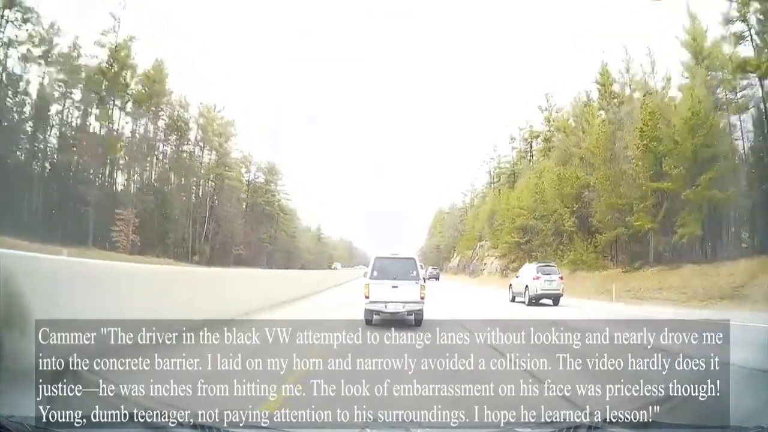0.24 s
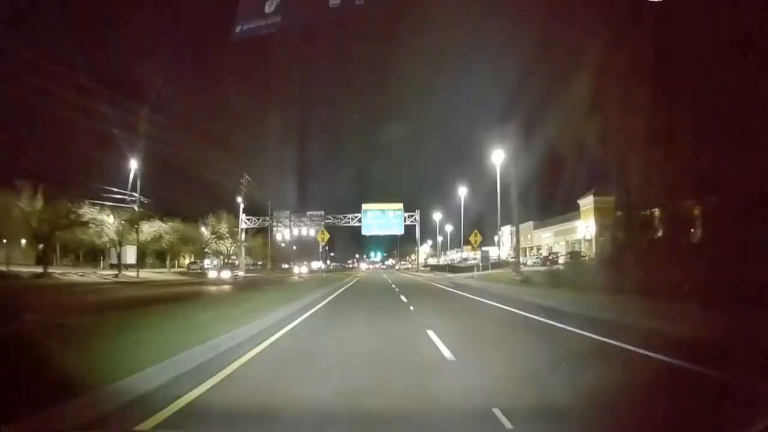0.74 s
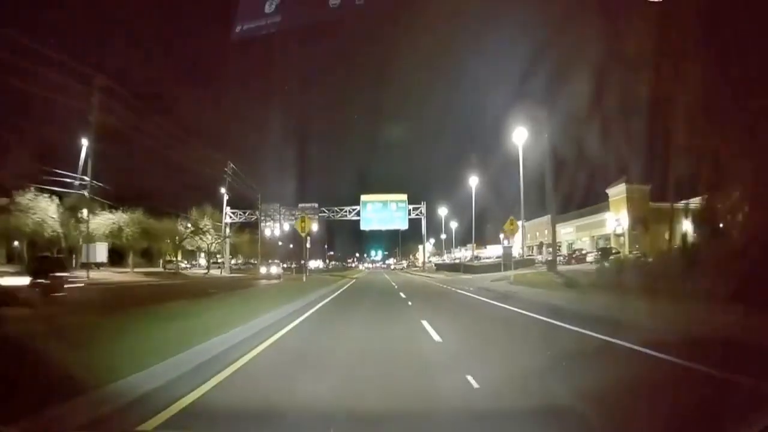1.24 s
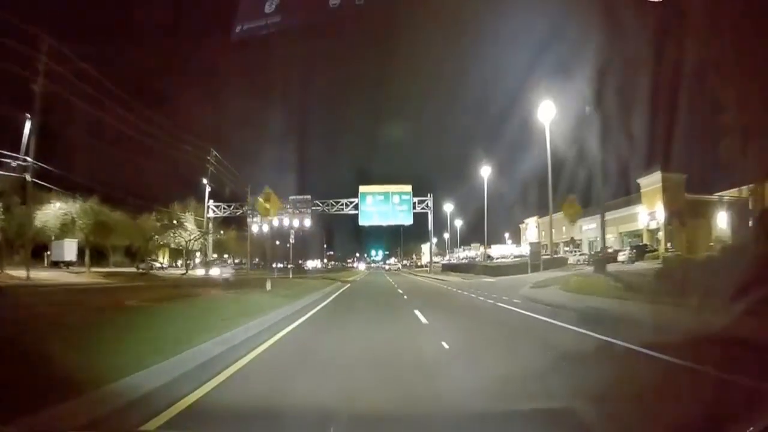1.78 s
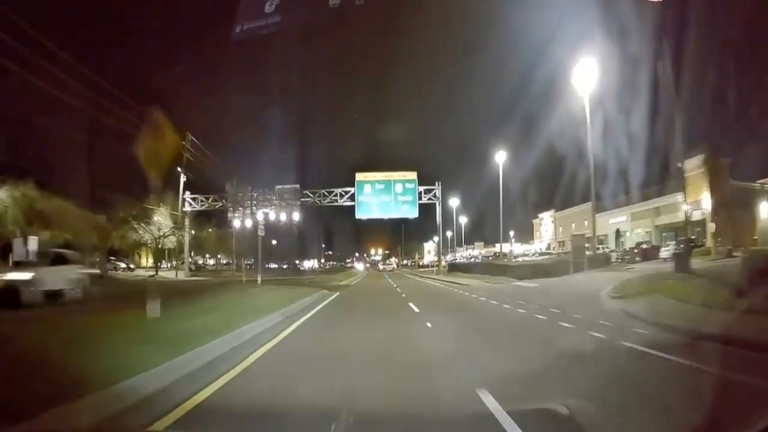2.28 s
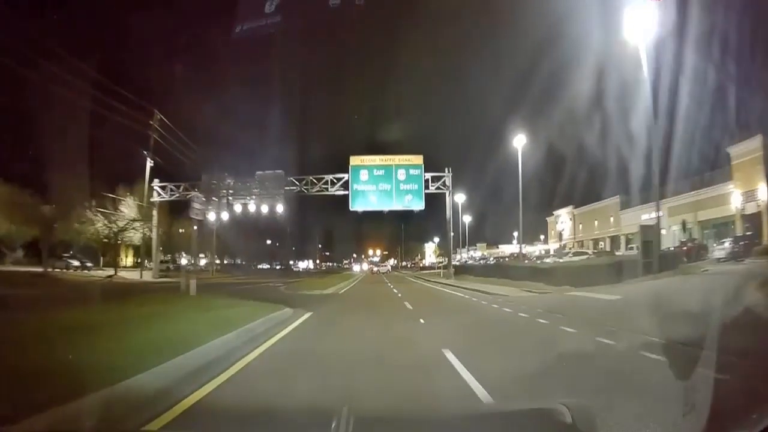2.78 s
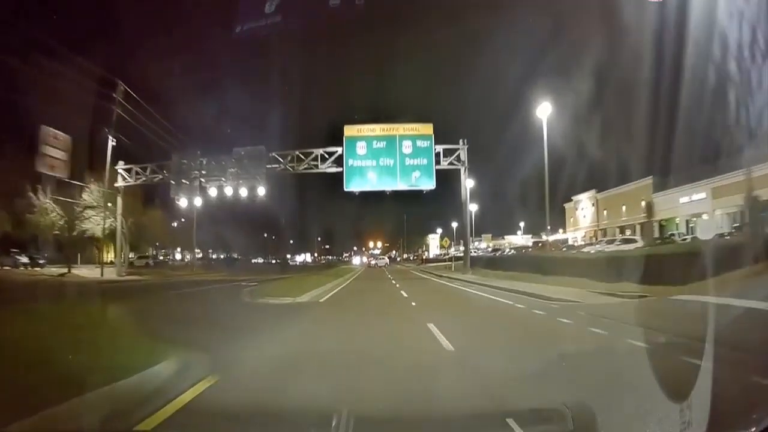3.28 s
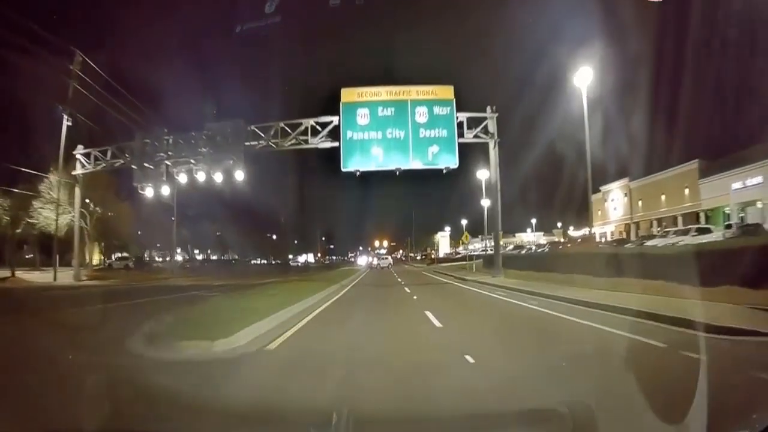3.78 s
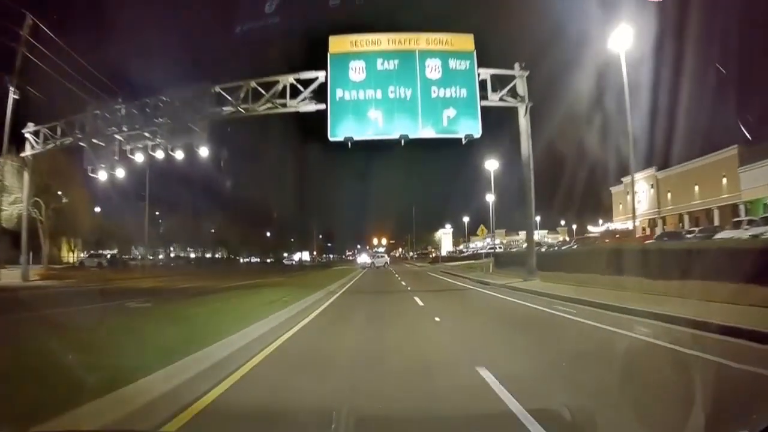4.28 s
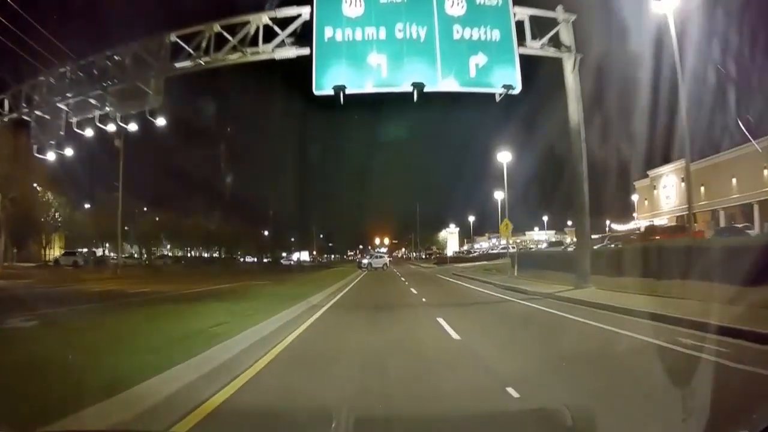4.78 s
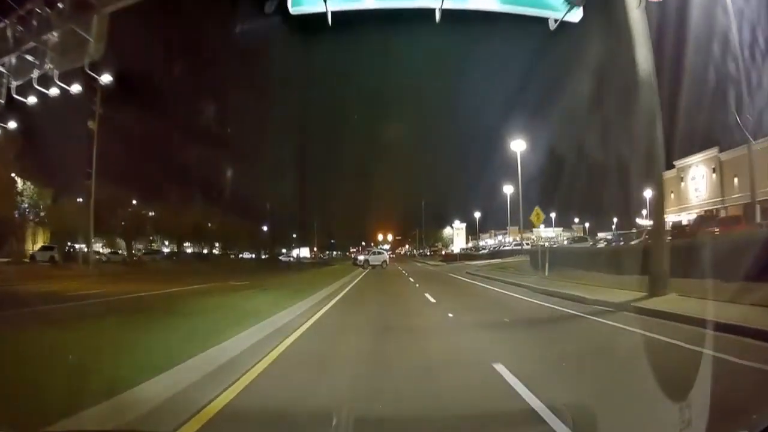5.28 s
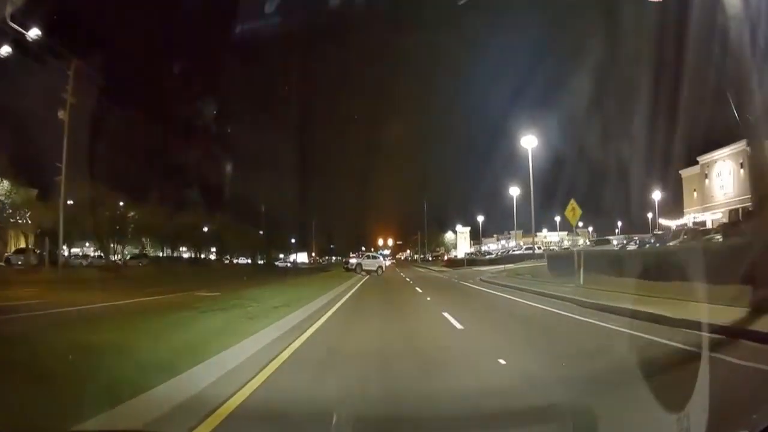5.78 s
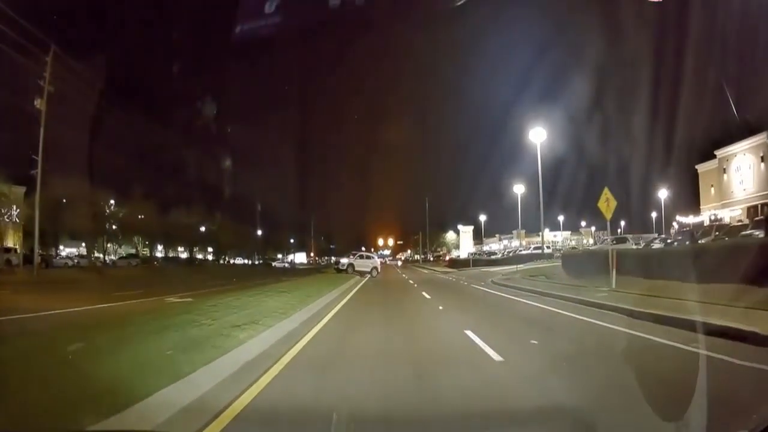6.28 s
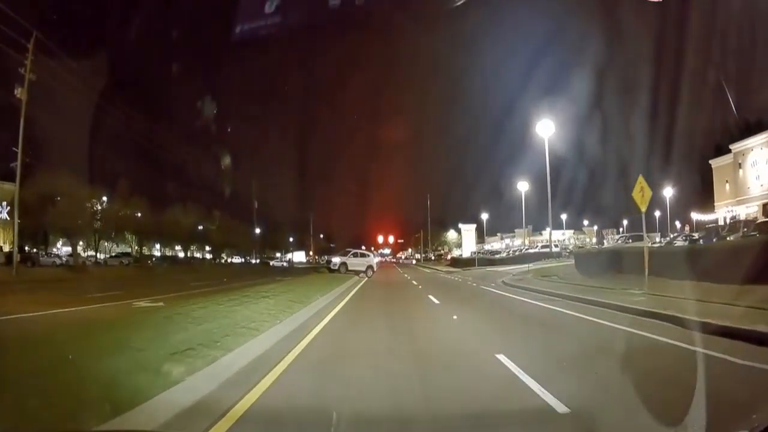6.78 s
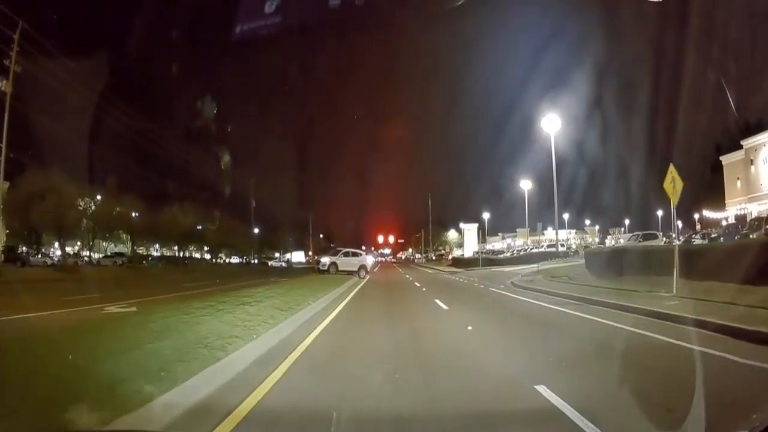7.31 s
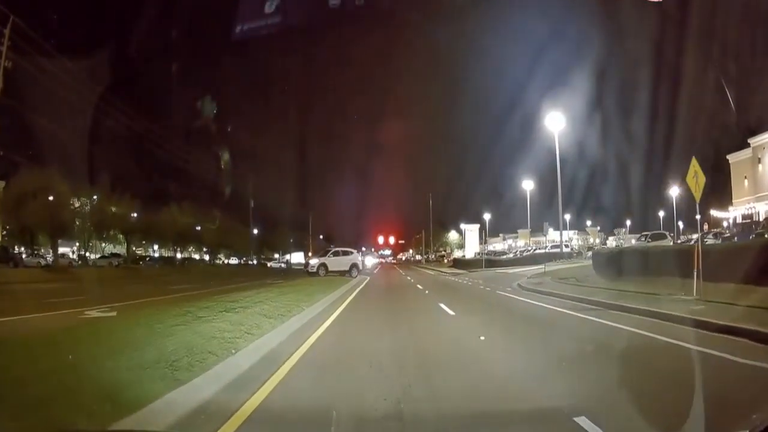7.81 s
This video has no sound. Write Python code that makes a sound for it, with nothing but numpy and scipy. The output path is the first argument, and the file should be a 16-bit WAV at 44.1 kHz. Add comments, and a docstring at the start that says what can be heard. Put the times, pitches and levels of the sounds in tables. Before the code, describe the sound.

A microphone inside a moving car picks up steady road roar, deep cabin rumble and faint air hiss, all starting suddenly. A quick run of wheel thumps shakes the interior trim. Afterwards the car coasts and brakes, so the tyre noise gradually fades and the low engine note falls towards idle. Meanwhile something small swings and clicks softly against plastic, a few ticks at a time.

```python
"""Tyre roar, body boom and a falling engine note cut in abruptly, inside a car already at speed.
It coasts, then slows for a red light: the roar fades, the hiss at the seals dies away, and the road
drives the body, the cabin air and the air in the tyres, each hardest at its own speed.
The wheels thud over a rough patch and rattle the trim; then a small loose piece swings
and ticks against plastic in little clusters."""
import sys
import numpy as np
from scipy import signal
from scipy.fft import rfft, irfft, next_fast_len
from scipy.io import wavfile
from scipy.ndimage import uniform_filter1d

SR = 44100
rng = np.random.default_rng(int(sys.argv[2]) if len(sys.argv) > 2 else 0)


def file_out(sig):
    """Save sig as 16-bit WAV at sys.argv[1]."""
    # one column per channel
    cols = np.atleast_2d(sig).T
    # limit, then scale
    lim = np.clip(cols, -1, 1)
    pcm = np.round(lim * 32767).astype(np.int16)
    wavfile.write(sys.argv[1], SR, pcm)


N = 355005
T = np.arange(N) / SR

# Tyre roar at high and low speed, air at the seals: freq_hz, density_db
FAST_ROAR_SPECTRUM = [(30, 6), (85, -2), (180, 2), (300, -2.5), (500, -3.5), (1000, -6.5), (1280, -7.5),
                      (1500, -23.5), (1900, -37), (3000, -36), (4200, -66), (9000, -51)]
SLOW_ROAR_SPECTRUM = [(30, 6), (55, 3), (85, 5), (180, 6), (300, -1), (500, -3), (1000, -5.5), (1280, -8),
                      (1500, -18.5), (1900, -24), (3000, -31), (4200, -46), (9000, -70)]
SEAL_SPECTRUM = [(500, -8.5), (1500, 9), (2000, 3), (2600, 2), (3000, -1), (3500, -2), (3900, -12.5),
                 (5000, -16), (8000, -21), (15000, -20.5)]
# Cabin resonances, tread whine, seal sizzle: centre_hz, width_hz, lift_db
CABIN_PEAKS = [(379, 76, 3.5), (470, 18, 4.5), (532, 38, 5), (660, 29, 6), (757, 86, 4.5), (894, 57, 6),
               (1012, 61, 6.5), (1172, 38, 4), (1256, 45, -0.5), (2925, 230, 5.5), (3490, 170, 3)]
TREAD_PEAKS = [(1040, 85, 2.5)]
SEAL_PEAKS = [(2930, 140, 3)]

def tyres_and_seals(grain_db=0.5, flutter_db=1.23, draught_db=-61):
    """Tyres roar and air hisses at the seals; both fall with speed and flutter with the road's grain."""
    halvings, smooth = speed_halvings(), smoothness()
    roar_db = -28 - 10.5 * halvings - 3.5 * smooth
    rush_db = -46 - 34.5 * halvings - 3 * smooth
    slow_share = np.clip((-27 - roar_db) / 16, 0, 1)  # quieter roar, slower car
    fast = noise(FAST_ROAR_SPECTRUM, CABIN_PEAKS) * gain_of(1)
    slow = noise(SLOW_ROAR_SPECTRUM, CABIN_PEAKS + TREAD_PEAKS) * gain_of(2)
    roar = np.sqrt(1 - slow_share) * fast + np.sqrt(slow_share) * slow
    rush = noise(SEAL_SPECTRUM, CABIN_PEAKS + SEAL_PEAKS) * gain_of(rush_db)
    draught = noise(SEAL_SPECTRUM, CABIN_PEAKS) * gain_of(draught_db)
    hiss = (rush + draught) * gain_of(flutter_db * noise([(2, -1.8), (20, -1.2)]))
    grain = gain_of(grain_db * noise([(3, 7), (30, -5), (90, -42)]))
    return grain * (roar * gain_of(roar_db) + hiss)


# Body shudder, cabin boom, tyre cavity ring, low drone: freq_hz, density_db
SHUDDER_SPECTRUM = [(8, -37), (20, -2), (32, 2), (44, 7.5), (54, -6.5), (70, -12), (120, -43)]
BOOM_SPECTRUM = [(55, -30), (76, -19), (95, -12.5), (112, -4), (124, -1), (138, -3), (160, -10.5),
                 (220, -17.5)]
CAVITY_SPECTRUM = [(150, -32), (205, -5), (225, -7), (245, 0), (262, -4.5), (295, -10.5), (370, -11),
                   (450, -16.5), (600, -63)]
DRONE_SPECTRUM = [(62, -20), (78, -4.5), (92, -3), (112, 1), (132, -18)]
# Side resonances of boom and tyre ring: centre_hz, width_hz, lift_db
BOOM_PEAKS = [(115.4, 5, -1.5), (134.7, 5.3, 5.5)]
CAVITY_PEAKS = [(224.8, 8.8, 12)]
# Brief swells and dips in the low shudder, boom and tyre ring:
# centre_s, shudder_lift_db, boom_lift_db, cavity_lift_db
LOW_SWELLS = [(.95, 1.5, 4.5, 3.5), (1.87, -1, -2, 3), (2.5, -1.5, 3.5, 5), (3.32, 3, -1, 5),
              (3.72, -5, 3.5, 2.5), (4.26, -1, 0.5, 4.5), (4.5, -3, 3.5, 1), (4.95, 4.5, -0.5, 3),
              (5.22, 2, 1.5, 0), (5.56, 5.5, -0.5, 5.5), (5.82, 2, -0.5, 3.5), (6.09, 4, 0.5, 6),
              (6.48, 1, 4, 4.5), (6.93, 1, 4, 5.5), (7.3, 4, -1.5, 0.5), (7.85, -8, 3.5, 5)]

def low_resonances(wander_db=0.98, swell_half_width_s=0.13):
    """The road drives the sprung body, cabin air and air in the tyres; a drone joins at low speed."""
    wander = gain_of(wander_db * noise([(1, 9), (6, -15)]))
    centre_s, *lifts_db = np.transpose(LOW_SWELLS)
    swell_shapes = np.exp(-((T[:, None] - centre_s) / swell_half_width_s) ** 2)
    shudder_db, boom_db, cavity_db = (swell_shapes @ lift_db for lift_db in lifts_db)
    shudder_db -= 3 * smoothness()
    shudder = steadied(noise(SHUDDER_SPECTRUM), size=12000)
    shudder *= gain_of(shudder_db + drive_db(top_db=-32, best_speed=0.95, loss_db=4.6))
    boom = steadied(noise(BOOM_SPECTRUM, BOOM_PEAKS) + hum(122.5, -1.7), size=6000)
    boom *= gain_of(boom_db + drive_db(top_db=-30.5, best_speed=0.64, loss_db=14.4))
    cavity_hum = hum(241, -5.5) * gain_of(1.3 * cavity_db)  # pitch clears as the ring swells
    cavity = steadied(noise(CAVITY_SPECTRUM, CAVITY_PEAKS) + cavity_hum, size=6000)
    cavity *= gain_of(cavity_db + drive_db(top_db=-34, best_speed=0.75, loss_db=16))
    drone = noise(DRONE_SPECTRUM) * gain_of(drive_db(top_db=-42.5, best_speed=0.41, loss_db=42))
    return wander * (shudder + boom + cavity + drone)


def drive_db(top_db, best_speed, loss_db):
    """Resonance level: peaks at best_speed (cruise = 1), down by loss_db at half or double that."""
    return top_db - loss_db * (speed_halvings() + np.log2(best_speed)) ** 2


def hum(pitch_hz, relative_db, waver_hz=2.467, throb_db=3):
    """Near-pure core of a resonance; throbs and wavers in pitch."""
    hz = pitch_hz + waver_hz * noise([(1, 0), (5, -1.5), (15, -13.5)])
    phase = 2 * np.pi * np.cumsum(hz) / SR
    throb = gain_of(throb_db * noise([(4, 3), (9, 0), (20, -16)]))
    return gain_of(relative_db) * unit_rms(np.sin(phase) * throb)


# Engine firing rate: time_s, rate_hz
FIRING_RATE = [(.7, 63.5), (2.7, 60.5), (3.6, 50.94), (4.1, 46.9), (4.95, 43.74), (5.6, 35.93),
               (8.05, 29.38)]

def engine(resonant_db=-31.5, waver_db=3.0, body_hz=41.8, half_width_hz=3.8):
    """The firing note sinks towards idle and swells as it passes the body's resonance."""
    firing_hz = follow(FIRING_RATE)
    phase = 2 * np.pi * np.cumsum(firing_hz) / SR
    note = np.sin(phase) + gain_of(-17) * np.sin(2 * phase) + gain_of(-14) * np.sin(4 * phase)
    response = 1 / np.hypot(1, (firing_hz - body_hz) / half_width_hz)
    return unit_rms(note) * response * gain_of(resonant_db + waver_db * noise([(1, 25), (8, -21)]))


# Rough patch, later a seam: start_s, thud_db, trim_db, rattle_db, piece_db, plastic_db
WHEEL_BLOWS = [(2.779, -19, -15, -35, -52, -42), (2.792, -32, -16, -47, -56, -47),
               (2.799, -23, -18, -35.5, -44, -47), (2.863, -27, -35, -34.5, -47, -42),
               (2.927, -34, -37, -42, -58, -46), (2.997, -10, -30, -34.5, -40.5, -39),
               (3.062, -31, -34, -38, -54, -46), (3.067, -15, -17, -36, -48, -42),
               (3.453, -19.5, -27, -50, -66, -58), (5.651, -29.5, -50, -55, -68, -66)]
# Suspension and trim panel modes: pitch_hz, level_db, t60_s
SUSPENSION_MODES = [(123, -4, 0.088), (354, -10, 0.06), (503, 0, 0.03), (722, -3.5, 0.04),
                    (1224, -7.5, 0.039), (1350, -16, 0.027), (1840, -21, .03)]
TRIM_MODES = [(961, -1, 0.069), (2820, -26, 0.04), (5060, -27, 0.028)]
# Trim rattle: freq_hz, density_db
RATTLE_SPECTRUM = [(600, -9), (1500, 4), (2400, 2.5), (3200, -9), (4000, -14), (5000, -11), (6000, -14),
                   (7000, -20), (11000, -22.5), (16000, -35)]

def bumps(rattle_t60_s=0.088, rise_s=0.001, chatter_from_s=2.938, chatter_to_s=2.975, knocks=4):
    """Blows thud through the suspension, shake the trim and jolt the loose piece; chatter between."""
    out, t = np.zeros(N), np.arange(6000) / SR
    attack = 1 - np.exp(-t / rise_s)
    slot_s = (chatter_to_s - chatter_from_s) / knocks
    knock_times_s = chatter_from_s + slot_s * (np.arange(knocks) + rng.random(knocks))
    chatter = [(start_s, -41, -43, -43, -51, -51) for start_s in knock_times_s]
    for start_s, thud_db, trim_db, rattle_db, piece_db, plastic_db in list(WHEEL_BLOWS) + chatter:
        thud = gain_of(thud_db) * struck(SUSPENSION_MODES, t)
        trim = gain_of(trim_db) * struck(TRIM_MODES, t)
        rattle = noise(RATTLE_SPECTRUM, size=len(t)) * gain_of(rattle_db - 60 * t / rattle_t60_s)
        add(out, start_s, attack * (thud + trim + rattle))
        add(out, start_s, contact(piece_db, plastic_db))
    return out


def struck(modes, t):
    """A blow rings decaying modes at random phases."""
    pitch_hz, level_db, t60_s = np.transpose(modes)[:, :, None]
    phase = 2 * np.pi * (pitch_hz * t + rng.random(pitch_hz.shape))
    return (gain_of(level_db - 60 * t / t60_s) * np.sin(phase)).sum(0)


# Loose piece, one cluster per swing, about 0.63 s apart: start_s, piece_db, plastic_db, crack_db
SWING_TICKS = [(3.344, -46.5, -58, -50), (3.398, -56, -46, -42), (3.893, -62, -62, -47),
               (3.946, -48.5, -52, -51), (3.967, -52, -58, -56), (3.990, -48, -56, -46),
               (4.525, -57, -57, -46), (4.592, -54, -53, -46), (4.608, -50.5, -58, -51),
               (4.662, -53, -56, -48), (5.16, -51, -62, -52), (5.172, -60, -64, -52),
               (5.186, -49, -49, -46), (5.247, -42.5, -50, -47), (5.253, -53, -51, -51),
               (5.263, -50, -60, -56), (5.277, -47, -54, -41), (5.297, -57, -53, -42),
               (5.384, -66, -56, -56), (5.509, -64, -55, -52), (5.784, -54, -58, -48),
               (5.79, -53, -58, -56), (5.857, -47, -48, -48), (5.869, -50, -64, -55),
               (5.911, -51, -53, -46), (5.937, -59, -54, -53), (6.387, -56, -56, -57),
               (6.395, -52, -54, -55), (6.480, -45.5, -54, -48), (6.487, -66, -52, -61),
               (6.494, -50, -60, -55), (6.507, -56, -59, -58), (6.531, -50, -56, -43),
               (6.541, -62, -50, -45), (6.553, -62, -55, -47), (7.100, -48.5, -50, -51),
               (7.119, -57, -59, -58), (7.176, -58, -51, -50), (7.191, -64, -56, -55),
               (7.626, -59, -65, -53), (7.636, -62, -50.5, -50), (7.740, -58, -64, -60),
               (7.774, -60, -57, -52)]
# Dry crack of a contact: freq_hz, density_db
CRACK_SPECTRUM = [(1000, 5), (2000, -2.5), (2700, -2), (3700, -10), (4500, -12.5), (6000, -7.5),
                  (7200, -18), (12000, -23)]

def loose_piece(crack_t60_s=0.032, tail_db=-17, tail_t60_s=0.19, rise_s=0.00073):
    """Each tick of the swinging piece is a ring and a dry crack with a faint cabin tail."""
    out, t = np.zeros(N), np.arange(4000) / SR
    decay = gain_of(-60 * t / crack_t60_s) + gain_of(tail_db - 60 * t / tail_t60_s)
    envelope = decay * (1 - np.exp(-t / rise_s))
    for start_s, piece_db, plastic_db, crack_db in SWING_TICKS:
        add(out, start_s, contact(piece_db, plastic_db))
        add(out, start_s, gain_of(crack_db) * noise(CRACK_SPECTRUM, size=len(t)) * envelope)
    return out


# Modes of the loose piece and the plastic it hits: pitch_hz, relative_db, t60_s
PIECE_MODES = [(3410, -3, 0.016), (3550, 2, 0.021), (3740, -2, 0.016), (3880, -6, 0.01), (4160, -4.5, .011),
               (4900, -18, .012), (5270, -20, .012), (6100, -15, .012)]
PLASTIC_MODES = [(1870, -5, .02), (2460, -1, 0.02), (2870, 0, 0.029), (3116, 2, 0.025)]

def contact(piece_db, plastic_db):
    """Piece hits plastic: a bright click from one, a duller knock from the other."""
    return gain_of(piece_db) * tick_ring(PIECE_MODES) + gain_of(plastic_db) * tick_ring(PLASTIC_MODES)


def tick_ring(modes, spread_db=2.5, detune=0.0099, rise_s=0.0003, echo_db=-32, echo_t60_s=0.15):
    """A small hard part rings, hit on a new spot each time; nearby surfaces scatter the sound."""
    t = np.arange(4000) / SR
    pitch_hz, relative_db, t60_s = np.transpose(modes)[:, :, None]
    spot, shift = rng.standard_normal((2, len(pitch_hz), 1))
    decay = gain_of(relative_db + spread_db * spot - 60 * t / t60_s)
    ring = (decay * np.sin(2 * np.pi * pitch_hz * (1 + detune * shift) * t)).sum(0)
    ring *= 1 - np.exp(-t / rise_s)
    reflections = rng.standard_normal(len(t)) * gain_of(echo_db - 60 * t / echo_t60_s)
    ring += signal.fftconvolve(ring, reflections)[:len(t)]
    return ring / np.std(ring[:220])  # unit level over the first 5 ms


# Brushing touch: start_s, level_db
BRUSH_TOUCHES = [(1.081, -47)]
# Its hiss: freq_hz, density_db
BRUSH_SPECTRUM = [(2500, -12), (4000, -1), (8500, 2), (12000, -5), (16000, -8)]

def brush(t60_s=0.1, rise_s=0.002):
    """A soft, hissy touch near the microphone."""
    out, t = np.zeros(N), np.arange(4000) / SR
    for start_s, level_db in BRUSH_TOUCHES:
        envelope = gain_of(level_db - 60 * t / t60_s) * (1 - np.exp(-t / rise_s))
        add(out, start_s, noise(BRUSH_SPECTRUM, size=len(t)) * envelope)
    return out


# Coasting, then braking: time_s, speed_ratio (cruise = 1)
CAR_SPEED = [(.7, 0.99), (2.7, 1), (3.7, 0.92), (5.05, 0.69), (5.7, 0.56), (6.3, 0.44), (7.2, 0.37),
             (8.05, .3)]

def speed_halvings():
    """Octaves of speed below cruise."""
    return -np.log2(follow(CAR_SPEED))


def smoothness(from_s=3.07, over_s=0.052):
    """0 on coarse asphalt, 1 on the smooth asphalt past the rough patch."""
    return np.clip((T - from_s) / over_s, 0, 1)


def noise(spectrum, peaks=(), size=N):
    """Unit-rms noise: smooth spectrum plus resonant peaks."""
    length = next_fast_len(size)
    bin_hz = np.fft.rfftfreq(length, 1 / SR)
    freq_hz, density_db = np.transpose(spectrum)
    shape_db = np.interp(np.log(bin_hz + 1), np.log(freq_hz), density_db, left=-100, right=-100)
    for centre_hz, width_hz, lift_db in peaks:
        shape_db += lift_db / (1 + (2 * (bin_hz - centre_hz) / width_hz) ** 2)
    white = rfft(rng.standard_normal(length))
    return unit_rms(irfft(white * gain_of(shape_db), length)[:size])


def steadied(x, size):
    """Levels the slow swells of a narrow noise; quick flutter stays."""
    power = uniform_filter1d(uniform_filter1d(x ** 2, size), size)
    return x / np.sqrt(abs(power) + 1e-9)


def gain_of(db):
    """Decibels to gain."""
    return 10 ** (np.asarray(db) / 20)


def unit_rms(x):
    """Scales to rms 1."""
    return x / np.sqrt(np.mean(x ** 2) + 1e-20)


def follow(rows):
    """Interpolates (time_s, value) rows at every sample."""
    return np.interp(T, *np.transpose(rows))


def add(mix, start_s, sound):
    """Mixes a sound in at start_s."""
    part = mix[round(start_s * SR):][:len(sound)]
    part += sound[:len(part)]


def scene():
    """Everything heard at the windscreen, mono."""
    return (tyres_and_seals() + low_resonances() + engine() + bumps() + loose_piece() + brush())[None]


# Microphone hiss: freq_hz, density_db
MIC_HISS_SPECTRUM = [(100, 2), (3000, 4), (5000, 2.1), (7000, 0.3), (10000, -0.5), (14000, -1),
                     (14800, 0.18), (16000, 0)]
# Its drift: time_s, level_db
MIC_HISS_LEVEL = [(.7, -62), (3.7, -63), (5.3, -60.5), (7.4, -60.5), (8.05, -63.5)]

def record(dry, start_s=0.695, rise_s=0.0003, ceiling=0.3, cutoff_hz=15750):
    """Microphone hiss, abrupt start, squashed peaks, band limit."""
    hiss = gain_of(follow(MIC_HISS_LEVEL)) * noise(MIC_HISS_SPECTRUM)
    gated = (dry + hiss) * np.clip((T - start_s) / rise_s, 0, 1)
    squashed = gated / (1 + (gated / ceiling) ** 10) ** (1 / 10)
    lowpass = signal.firwin(511, cutoff_hz, window=("kaiser", 9), fs=SR)
    return signal.oaconvolve(squashed, lowpass[None], "same")


dry = scene()
out = record(dry)
file_out(out)
```